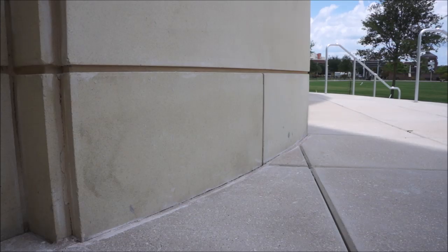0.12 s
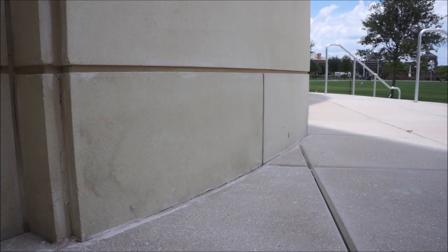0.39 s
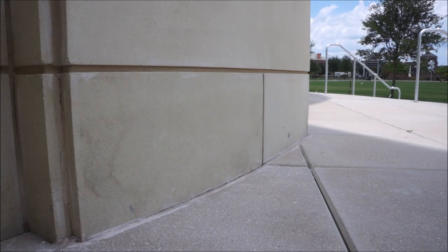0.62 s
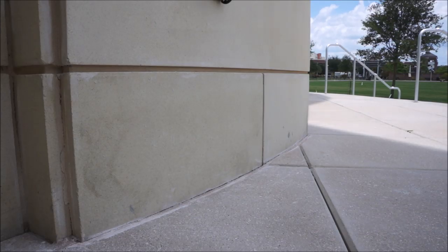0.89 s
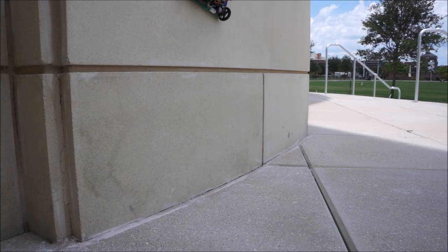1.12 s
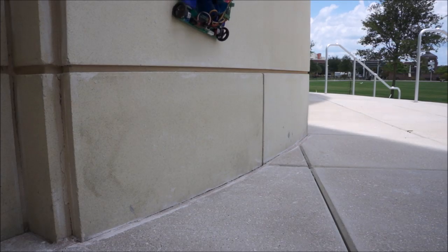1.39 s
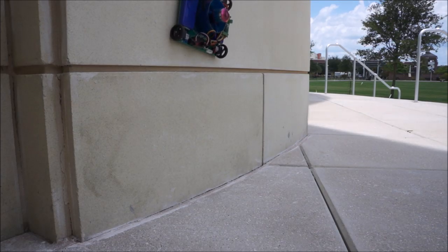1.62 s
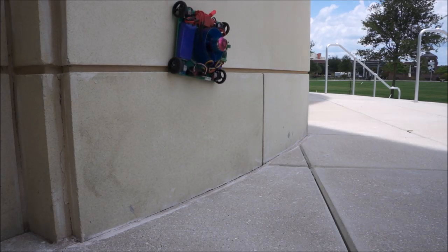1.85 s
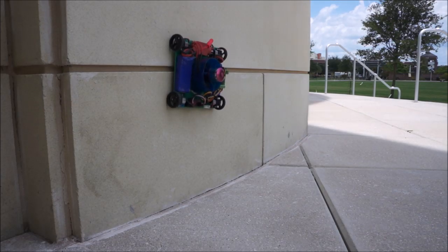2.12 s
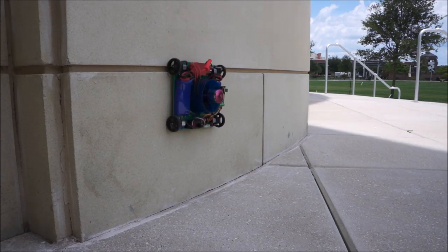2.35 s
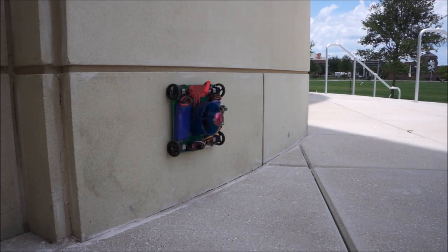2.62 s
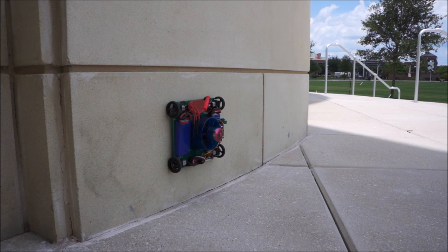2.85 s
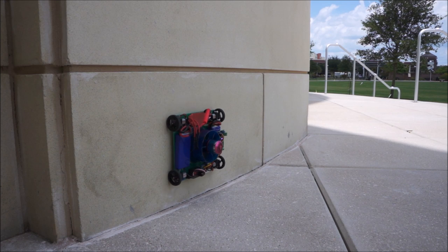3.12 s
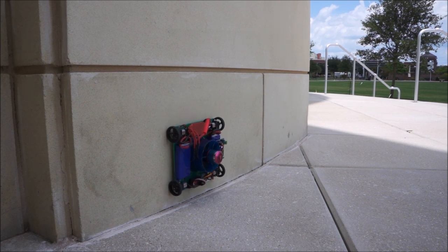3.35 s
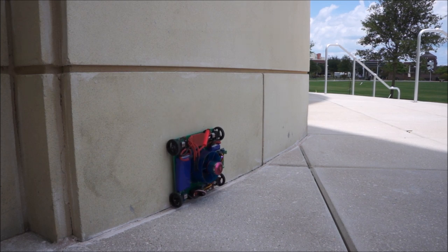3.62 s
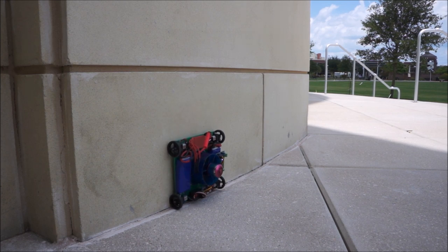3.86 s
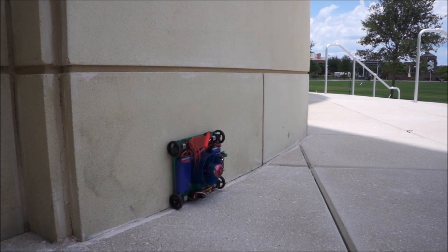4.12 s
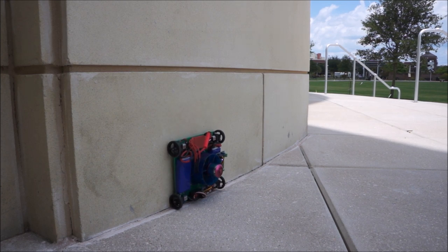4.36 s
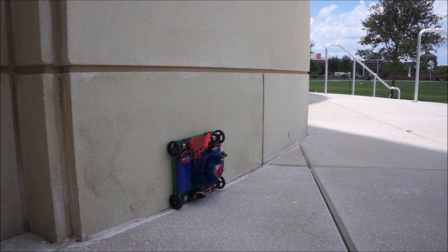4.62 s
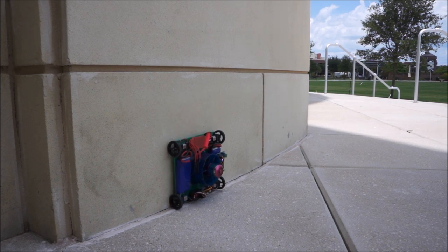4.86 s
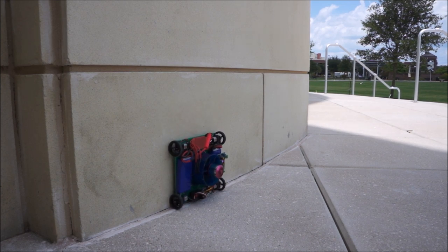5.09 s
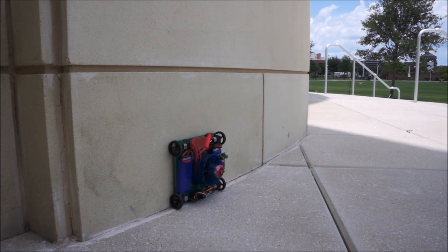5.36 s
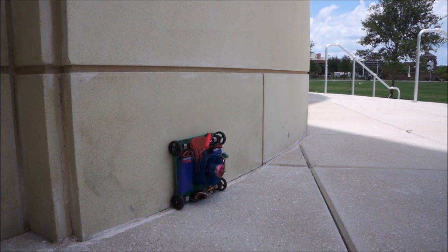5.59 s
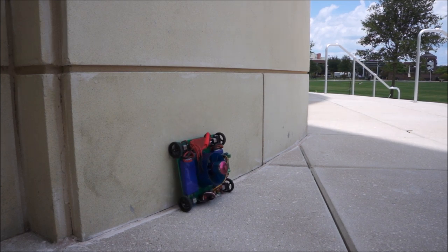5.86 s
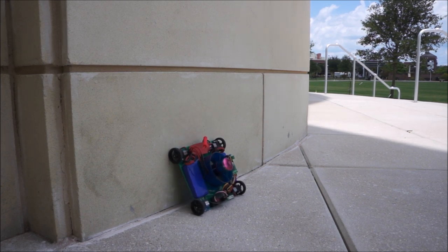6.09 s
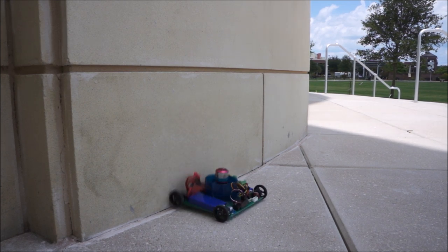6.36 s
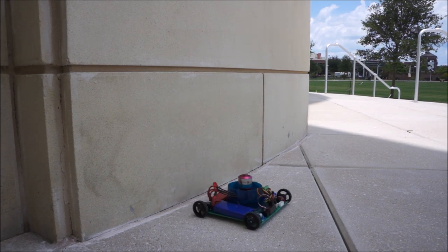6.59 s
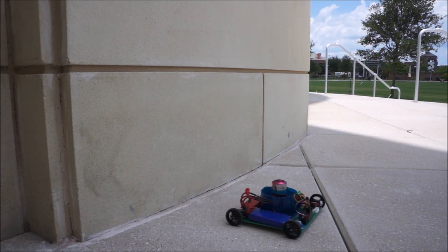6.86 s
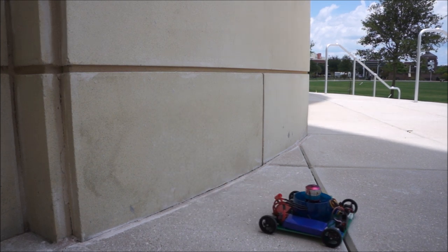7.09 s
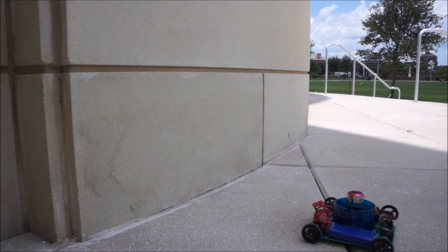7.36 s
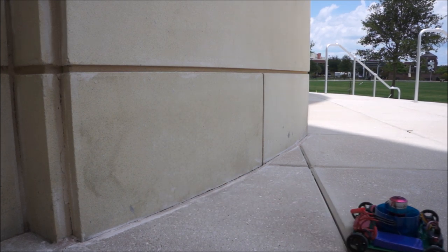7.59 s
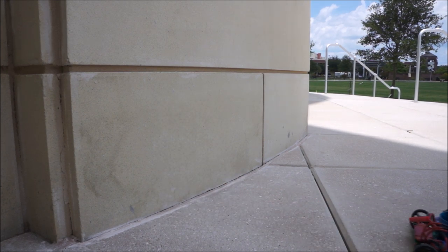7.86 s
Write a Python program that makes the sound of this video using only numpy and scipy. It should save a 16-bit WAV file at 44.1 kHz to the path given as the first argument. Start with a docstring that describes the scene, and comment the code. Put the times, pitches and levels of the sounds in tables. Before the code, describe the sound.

A continuous, loud miniature-turbine whine and rushing air fill the first six seconds, with a thin very high electronic tone on top and a hollow whistle while the robot sits at the wall's foot. It slows, scrapes metallically, and lands with quick clacks. The whine plunges and the airflow dies, uncovering chirps and geared motor buzz moving right, over faint open-air rumble. Stationary outdoor stereo microphone.

```python
"""Outdoors, by a wall above a pavement: a small suction robot rolls down, tips over and drives off.
The eight-blade fan is noise-scattered tones locked to shaft speed, over shaped-noise airflow; it slows twice
and coasts down. A shrinking ground echo sweeps a comb through it. Rubbing, leaks and landing clacks, thin
passing whines, a switching tone, gear noise and the low rumble of open air fill in the rest."""
import sys
import numpy as np
from scipy import signal
from scipy.fft import rfft, irfft, next_fast_len
from scipy.io import wavfile
from scipy.ndimage import uniform_filter1d, map_coordinates

SR = 44100
rng = np.random.default_rng(int(sys.argv[2]) if len(sys.argv) > 2 else 0)


def log_audio(samples):
    """Write samples as a 16-bit WAV file to the path given in sys.argv[1]."""
    # one column per channel
    frames = np.atleast_2d(samples).T
    # limit to full scale, then quantise
    limited = np.clip(frames, -1, 1)
    pcm = np.round(limited * 32767).astype(np.int16)
    wavfile.write(sys.argv[1], SR, pcm)


def field_ratio(decibels):
    """Amplitude ratio for a level in dB (20 dB per decade); scalars and array-likes work."""
    return 10 ** (np.asarray(decibels, dtype=float) / 20)


N = 351467
T = np.arange(N) / SR

# open air, far traffic and wind, spectrum shape: f/Hz, relative level/dB
OUTDOOR_SPECTRUM = [(20, -26), (35, -16), (65, -2), (120, 0), (250, -16), (500, -20), (1000, -42)]
# open air, course: t/s, level/dB
OUTDOOR_LEVEL = [(0, -66.5), (3.3, -64.5), (4.3, -61), (7.97, -60.5)]
# wheel gear noise, spectrum shape: f/Hz, relative level/dB
GEAR_SPECTRUM = [(120, -27), (200, -17), (378, -11), (454, -22), (618, -9), (755, -20), (1210, -6),
                 (1710, -5), (2020, -5), (3750, -11), (7800, -10), (9300, -17), (11200, -16.5),
                 (13900, -25), (15500, -52)]
# wheel gear noise, course: t/s, level/dB, treble boost/dB
GEAR_LEVEL = [(6.9, -39.5, -7), (7.2, -35.5, 2.5), (7.65, -35.5, 3), (7.97, -35.5, 5.5)]
# steady wheel-drive tones: f/Hz, level/dB, spread/Hz
DRIVE_TONES = [(382, -55, 4), (2045, -43, 120), (2437, -51, 30), (4872, -43, 12), (7311, -47, 30),
               (9749, -62, 10)]
# gear whine rising as the wheels speed up: midpoint t/s, start f/Hz, end f/Hz, length/s, level/dB
RISING_WHINE = [(7.73, 1430, 1750, .25, -45), (7.95, 600, 745, .2, -42), (7.9, 4050, 4300, .15, -44)]
# falling chirps of a motor tone: midpoint t/s, start f/Hz, end f/Hz, length/s, level/dB
FALLING_CHIRPS = [(6.715, 4880, 4750, .04, -29), (6.925, 3300, 3100, .05, -33),
                  (6.99, 4800, 4500, .05, -31), (7.19, 4750, 4550, .05, -37), (7.37, 4650, 4520, .05, -38)]
# switching tone of the fan controller: t/s, level/dB
SWITCH_LEVEL = [(0, -25), (.9, -31), (1.15, -21.5), (1.33, -28), (1.55, -27), (2.25, -25), (2.4, -39),
                (2.52, -27), (3.02, -33), (3.16, -28), (3.5, -28), (3.62, -40), (5.0, -40), (5.5, -27),
                (6.08, -44), (6.45, -24.5), (6.6, -28.5), (6.85, -52)]
# beats of switching tone and shaft: shaft multiple above the tone, start t/s, end t/s, level/dB, spread/Hz
SWITCH_BEATS = [(6, 5.0, 6.1, -34, 30), (6, 6.1, 6.75, -44, 30), (12, 5.1, 5.8, -39, 30),
                (12, 6.2, 6.45, -38, 30), (12, 6.42, 6.74, -33, 30)]
# passing whines of the fan, from motor or blades: shaft multiple, start t/s, end t/s, level/dB, spread/Hz
PASSING_WHINES = [(30, 0, 1.0, -43, 30), (30, 1.1, 2.4, -33, 30), (30, 2.9, 3.5, -40, 30),
                  (30, 3.7, 4.55, -40, 30), (24, .9, 1.7, -35, 30), (18, 4.95, 5.98, -30, 30),
                  (16, 5.0, 5.6, -31, 60), (16, 5.65, 6.0, -23, 450), (18, 6.5, 6.66, -31, 30),
                  (48, 6.74, 6.79, -25, 30), (18, 7.21, 7.28, -35, 30), (18, 7.42, 7.6, -42, 30),
                  (18, 7.58, 7.72, -35, 30), (18, 7.85, 8.1, -43, 30)]
# air whistling under the skirt: f/Hz, start t/s, end t/s, level/dB, spread/Hz
SKIRT_LEAKS = [(1088, 2.6, 3.55, -36, 25), (1558, 3.7, 4.7, -32, 70), (1555, 4.7, 5.78, -29.5, 80)]
# wheels landing on the pavement: t/s, level/dB, 60 dB decay/s
LANDINGS = [(6.082, -8, 0.12), (6.148, -3, 0.042), (6.428, -3, 0.049), (6.5, -5.5, 0.078),
            (6.56, -14, 0.051), (6.619, -18, 0.06)]
# airflow roar, spectrum shape: f/Hz, relative level/dB
ROAR_SPECTRUM = [(71, -57), (120, -38), (353, -11), (575, -15.5), (1560, -1), (1690, -0.5), (2870, 3.5),
                 (3370, 2), (5170, 2), (10500, -10), (15500, -26)]
# duct resonances on the roar: f/Hz, width/Hz, boost/dB
DUCT_MODES = [(740, 170, 3), (1098, 19, 5.5), (1552, 20, 3.5), (1820, 59, 2.5), (6000, 167, 2),
              (9340, 840, 3.5), (10990, 2560, 6)]
# airflow: t/s, level/dB, then relative to it skirt rumble/dB, duct body/dB, inlet hiss/dB
AIRFLOW = [(0, -17.5, -0.5, -0.5, 5.5), (2.8, -17, 2, 0, -1), (3.42, -16.5, 1, 1, -0.5),
           (3.92, -19, 4.5, 5.5, 1.5), (4.4, -16, 4, 2.5, -0.9), (5.24, -19.5, 5.5, 8, 2),
           (5.95, -20.5, 4, 3, 0.5), (6.35, -22.5, -1, 1, -0.5), (6.53, -21.5, 4.5, 5, 2),
           (6.971, -32, 2, 7, 3), (7.15, -42, -9, 12, 5)]
# fan shaft speed, throttled back twice, then coasting: t/s, turns per second f/Hz
SHAFT_SPEED = [(0, 366.5), (1.1, 367), (1.5, 368.5), (2.3, 366.3), (4.48, 359.5), (4.62, 345), (4.95, 312),
               (5.13, 304.3), (5.9, 304.2), (6.05, 288), (6.15, 284), (6.21, 277), (6.4, 276), (6.52, 272),
               (6.65, 257), (6.8, 217), (7, 156), (7.24, 114), (7.4, 92), (7.55, 77), (7.74, 64),
               (7.97, 48)]
# fan tones: t/s, unbalance hum level/dB, blade whine level/dB
FAN_LEVELS = [(0, -48, -17), (.65, -44.5, -19.5), (1.0, -40, -16), (1.45, -41, -14.5), (2.1, -44.5, -13.5),
              (2.7, -40.5, -18), (3.6, -37, -19), (4.3, -42.5, -15.5), (4.62, -39.5, -13),
              (5.05, -48, -9.5), (5.8, -38.5, -11.5), (6.12, -37.5, -9), (6.25, -67, -15), (6.45, -41, -26),
              (6.58, -41, -18), (6.68, -47, -10), (6.74, -53, -16.5), (6.85, -54, -15.5), (7.05, -46, -33),
              (7.5, -52, -54)]
# blade whine partials: shaft multiple, relative level/dB, spread/Hz
BLADE_TONES = [(8, -13, 60), (8, -12, 160), (8, -9, 500), (16, -21, 350), (24, -28, 500)]
# spells of the impeller brushing its housing: start t/s, end t/s, level/dB
RUB_SPELLS = [(6.042, 6.435, -25.5), (6.436, 6.59, -35)]
# housing bands that ring under the rub: f/Hz, width/Hz, relative level/dB
HOUSING_BANDS = [(280, 120, -13), (555, 120, -12), (1110, 100, -15), (1390, 150, -12), (1950, 150, -4),
                 (2225, 150, 4), (2500, 150, -8), (4450, 300, -6), (5550, 400, 3), (6100, 300, -8),
                 (7400, 800, 0)]
# rub partials between the harmonics: shaft multiple, spread/Hz, relative level/dB
RUB_PARTIALS = [(2.7, 35, -15), (3.68, 50, -8)]
# gain on the scattered layer that widens the stereo image: f/Hz, level/dB
STEREO_WIDTH = [(30, -13), (60, -20), (200, -36), (700, -29.5), (1100, -21), (1600, -11.5), (2400, -7),
                (4400, -7.5), (8100, -9), (8800, -6), (10500, -4.5), (11800, -11), (15000, -21)]
# stereo balance, shared equally by the channels: f/Hz, left minus right/dB
STEREO_TILT = [(2380, 0.068), (4400, -2.1), (8120, -1.5), (15000, 1)]
# stereo phase, shared equally by the channels: f/Hz, left ahead of right/rad
STEREO_LEAD = [(0, -0.02), (1640, -0.19), (2580, 0.61), (4500, 0.02), (8010, 0.71), (10100, 0.49),
               (10700, 0.48), (11700, 0.58)]

SHAFT_HZ = uniform_filter1d(np.interp(T, *np.transpose(SHAFT_SPEED)), SR // 16, mode="nearest")
SWITCH_HZ = 7988


def colour(x, points, modes=(), lead=((0, 0), (1, 0))):
    """Shape a spectrum by (Hz, dB) points and (Hz, width, dB) humps; turn its phase by (Hz, rad) points."""
    size = next_fast_len(N)
    hz = np.arange(size // 2 + 1) * SR / size + 1e-3
    point_hz, point_db = np.transpose(points)
    db = np.interp(np.log(hz), np.log(np.maximum(point_hz, 1)), point_db)
    db = db + sum(g / (1 + (2 * (hz - f) / w) ** 2) for f, w, g in modes)
    turn = np.exp(1j * np.interp(hz, *np.transpose(lead)))
    return irfft(rfft(x, size) * field_ratio(db) * turn, size)[..., :N]


def split(x, centres_hz):
    """Cross-fade the spectrum into overlapping parts that add up to the whole."""
    size = next_fast_len(N)
    hz = np.arange(size // 2 + 1) * SR / size + 1
    place = np.interp(np.log(hz), np.log(centres_hz), np.arange(len(centres_hz)))
    spectrum = rfft(x, size)
    gains = [np.clip(1 - abs(place - k), 0, 1) for k in range(len(centres_hz))]
    return [irfft(spectrum * gain, size)[..., :N] for gain in gains]


def band(x, lo_hz, hi_hz):
    """Band-pass."""
    return signal.sosfilt(signal.butter(2, [lo_hz, hi_hz], "band", fs=SR, output="sos"), x)


def unit(x):
    """Scale to rms 1."""
    return x / np.sqrt(np.mean(x ** 2))


def walk(rate_hz):
    """Smooth random wander of rms 1, drawn at a sixteenth of the sample rate."""
    length = max(int(SR / 16 / rate_hz), 1)
    steps = rng.standard_normal(N // 16 + 2)
    steps = uniform_filter1d(uniform_filter1d(steps, length), length)
    return np.interp(np.arange(N) / 16, np.arange(len(steps)), unit(steps))


def tone(hz, spread_hz, clean):
    """A tone near rms 1; turbulence scatters what is not clean into a narrow band of noise."""
    clean = np.clip(clean, 0, 1)
    scatter = np.sqrt((1 - clean ** 2) / 2)
    phase = 2 * np.pi * np.cumsum(hz + 0 * T) / SR
    in_phase = clean + scatter * walk(spread_hz)
    quadrature = scatter * walk(spread_hz)
    return np.sqrt(2) * (in_phase * np.cos(phase) + quadrature * np.sin(phase))


def swell(start, end, fade):
    """Gain that rises around start and falls around end; fade is a share of the length."""
    edge = fade * (end - start)
    return np.clip(np.minimum(T - start, end - T) / edge + .5, 0, 1) ** 2


def outdoors():
    """Open air: low noise whose level gusts up and down."""
    rumble = unit(colour(rng.standard_normal((2, N)), OUTDOOR_SPECTRUM))
    level_db = np.interp(T, *np.transpose(OUTDOOR_LEVEL)) + 2.8 * walk(6)
    return rumble * field_ratio(level_db)


def wheels():
    """Meshing gears as shaped noise plus steady drive tones; always running, heard once the fan fades."""
    s, db, treble_db = np.transpose(GEAR_LEVEL)
    noise = colour(rng.standard_normal((2, N)), GEAR_SPECTRUM)
    noise = noise / np.sqrt(np.mean(band(noise, 2500, 12000) ** 2))
    low, high = split(noise, [2500, 6000])
    level_db = np.interp(T, s, db) + 1.2 * walk(25)
    gears = (low + field_ratio(np.interp(T, s, treble_db)) * high) * field_ratio(level_db)
    gears[0] += sum(field_ratio(g) * tone(f, w, .7) for f, g, w in DRIVE_TONES)
    return gears


def glides():
    """Motor chirps and gear whine: tones sliding in pitch under a bell-shaped swell."""
    out = np.zeros(N)
    for s, start_hz, end_hz, length, db in FALLING_CHIRPS + RISING_WHINE:
        u = (T - s) / length
        hz = np.clip((start_hz + end_hz) / 2 + (end_hz - start_hz) * u, 100, 9000)
        out += field_ratio(db) * np.exp(-8 * u ** 2) * tone(hz, 30, 1.0)
    return out


def switching_and_whines():
    """A fixed switching tone, its beats with the shaft, and passing fan whines at multiples of shaft speed."""
    s, db = np.transpose(SWITCH_LEVEL)
    level_db = np.interp(T, s, db, right=-120) + 2.5 * walk(8)  # slight flicker
    out = field_ratio(level_db) * tone(SWITCH_HZ, 25, .9)
    for base_hz, rows in ((0, PASSING_WHINES), (SWITCH_HZ, SWITCH_BEATS)):
        for k, start, end, db, w in rows:
            out = out + field_ratio(db) * swell(start, end, .3) * tone(base_hz + k * SHAFT_HZ, w, 27 / w)
    return out


def leaks():
    """Air leaking under the skirt: breathy whistles of fixed pitch."""
    return sum(field_ratio(db) * swell(a, b, .2) * tone(hz, w, .5) for hz, a, b, db, w in SKIRT_LEAKS)


def knocks():
    """Wheels landing: broadband clacks, each an exponential decay of noise."""
    shape = np.zeros(N)
    for s, db, t60 in LANDINGS:
        shape += field_ratio(db) * (T > s) * np.exp(-np.log(1000) * np.maximum(T - s, 0) / t60)
    shape = uniform_filter1d(shape, SR // 400)  # softens the onsets
    return band(0.78 * rng.standard_normal(N) * shape, 610, 8200)


def air():
    """Turbulent flow: roar in four parts, with the hiss fluttering the most and the rumble steady."""
    s, *columns = np.transpose(AIRFLOW)
    level_db, rumble_db, body_db, hiss_db = (np.interp(T, s, c) for c in columns)
    level_db = level_db - 60 * np.maximum(T - s[-1], 0)  # dB per s: the flow dies as the impeller coasts
    roar = colour(rng.standard_normal((2, N)), ROAR_SPECTRUM, DUCT_MODES)
    roar = roar / np.sqrt(np.mean(band(roar[0], 3200, 6500) ** 2))
    rumble, body, core, hiss = split(roar, [450, 1500, 4000, 9500])
    gust_db = .35 * walk(14) + .7 * walk(120)
    low = field_ratio(rumble_db) * rumble + field_ratio(body_db + .8 * walk(10)) * body
    high = field_ratio(gust_db) * core + field_ratio(hiss_db + gust_db + 0.88 * walk(5.2)) * hiss
    return field_ratio(level_db) * (low + high)


def rub():
    """The impeller brushes its housing as the chassis twists: one touch a turn rings the housing bands."""
    treble_start_s, dull_db = 6.15, -19  # the treble joins late
    turns = np.cumsum(SHAFT_HZ) / SR
    touches = np.diff(np.floor(turns), prepend=0) * field_ratio(2.2 * rng.standard_normal(N))
    treble_db = dull_db * np.clip((treble_start_s - T) / .02, 0, 1)
    ring = np.zeros(N)
    for f, w, db in HOUSING_BANDS:
        ring += field_ratio(db + treble_db * (f > 4000)) * unit(band(touches, f - w / 2, f + w / 2))
    ring = ring + sum(field_ratio(db) * tone(k * SHAFT_HZ, w, .6) for k, w, db in RUB_PARTIALS)
    return ring * sum(field_ratio(db) * swell(a, b, .12) for a, b, db in RUB_SPELLS)


def fan():
    """Unbalance hums at the shaft rate; blades whine breathily at multiples of it."""
    s, hum_db, whine_db = np.transpose(FAN_LEVELS)
    hum_db = np.interp(T, s, hum_db) + 0.3 * walk(6.7)
    whine_db = np.interp(T, s, whine_db, right=-120) + 1.5 * walk(7.3)
    hum = field_ratio(hum_db) * tone(SHAFT_HZ, 7.7, 0.59)
    hum = hum * np.clip((SHAFT_HZ - 200) / 50, 0, 1)  # unbalance dies fast with speed
    whine = field_ratio(whine_db) * sum(field_ratio(db) * tone(k * SHAFT_HZ, w, .15) for k, db, w in BLADE_TONES)
    return hum + whine


def pavement(x):
    """Adds a duller ground bounce; its detour shrinks on the way down, and it weakens near the ground."""
    high_ms, low_ms, halfway_s, descent_s = 0.95, 0.099, 2.135, 0.53
    share_high, share_low, fade_ms = .6, .45, .15
    extra_ms = (high_ms - low_ms) / (1 + np.exp((T - halfway_s) / descent_s))
    late = np.arange(N) - (low_ms + extra_ms) * SR / 1000
    share = share_low + (share_high - share_low) * np.clip(extra_ms / fade_ms, 0, 1)
    bounce = np.array([np.interp(late, np.arange(N), c) for c in x])
    dull = signal.butter(1, 2100, fs=SR, output="sos")
    return x + share * signal.sosfilt(dull, bounce)


def scene():
    """Direct sound sits nearly alike in both channels; a scattered layer goes in with opposite signs."""
    drive_off_s, pan_db_per_s, lag_ms_per_s = 6.4, -1.8, 0.076
    robot = air()
    robot[0] += fan() + rub()
    direct, scattered = pavement(robot) + wheels() + outdoors()
    direct = direct + switching_and_whines() + glides() + knocks() + leaks()
    side = colour(scattered, STEREO_WIDTH)
    tilt, lead = np.array(STEREO_TILT) * [1, .5], np.array(STEREO_LEAD) * [1, .5]
    left = colour(direct + side, tilt, lead=lead)
    right = colour(direct - side, tilt * [1, -1], lead=lead * [1, -1])
    # the robot leaves to the right: the left channel falls back in level and time
    away = np.maximum(T - drive_off_s, 0)
    pan = field_ratio(pan_db_per_s * away / 2)
    left = map_coordinates(left, [(T - lag_ms_per_s / 1000 * away) * SR], mode="mirror")
    return np.array([pan * left, right / pan])


def roll_off(x):
    """The treble ends steeply here."""
    return signal.sosfilt(signal.butter(12, 15650, fs=SR, output="sos"), x)


def record(dry):
    """The highest peaks clip at full scale."""
    mix = np.clip(dry, -1, 1)
    return roll_off(mix)


dry = scene()
out = record(dry)
log_audio(out)
```